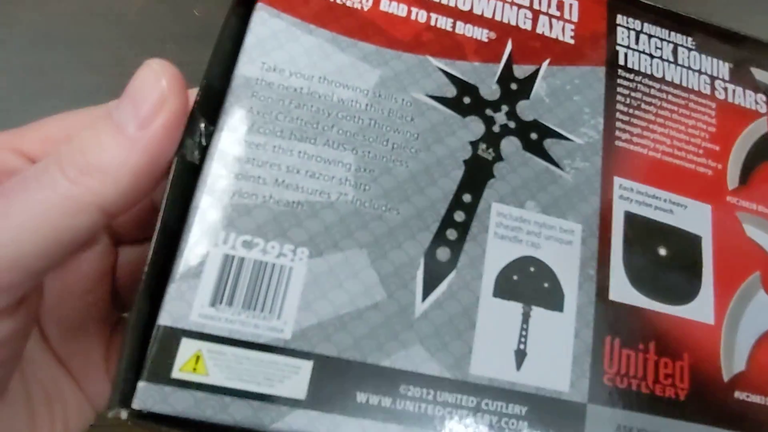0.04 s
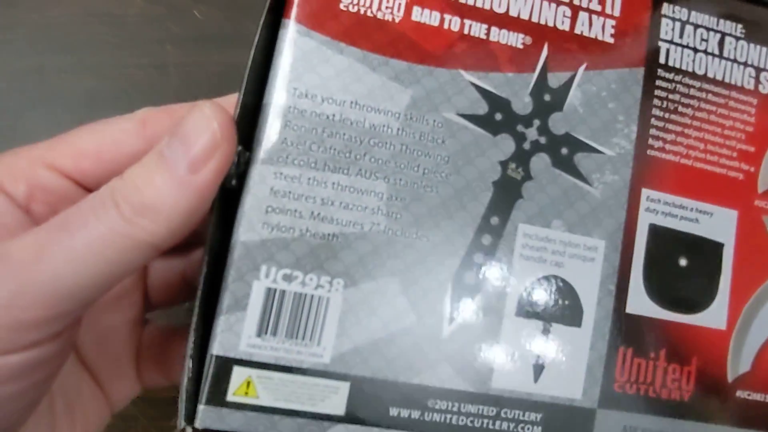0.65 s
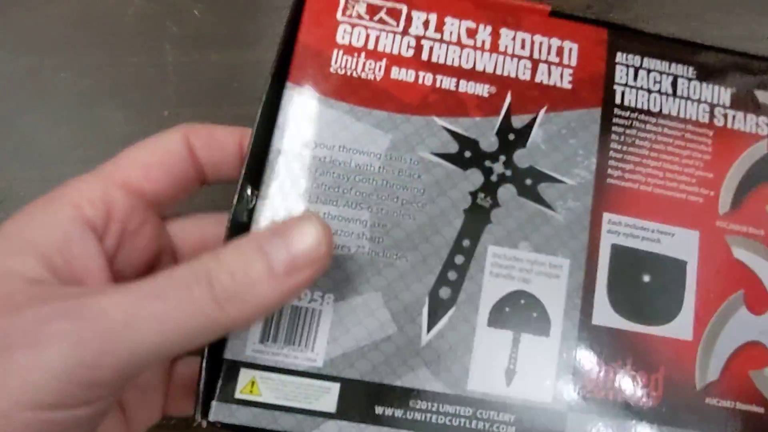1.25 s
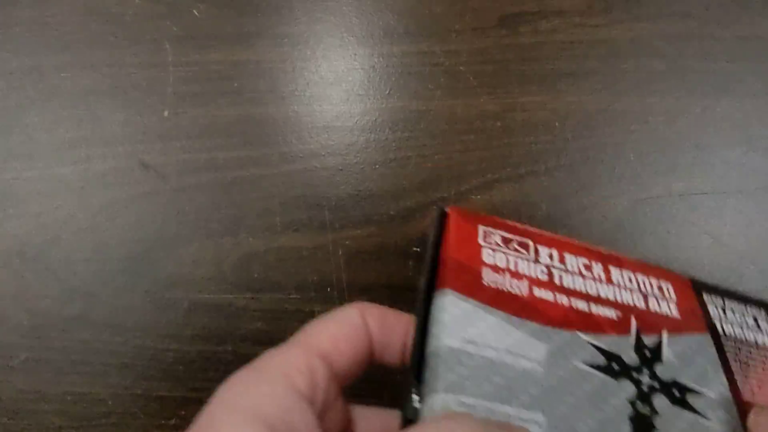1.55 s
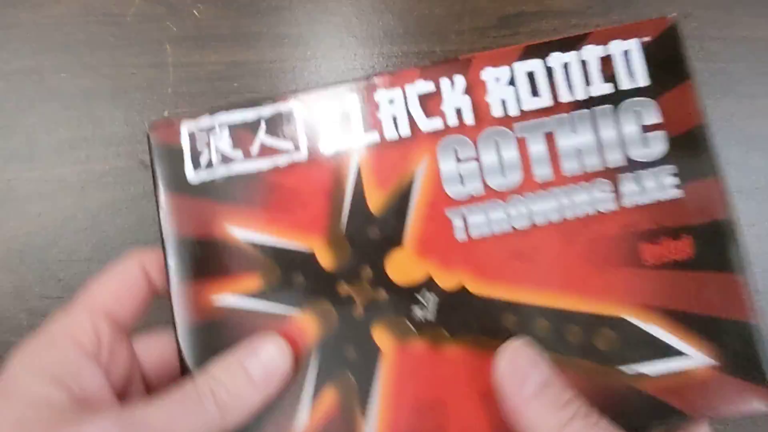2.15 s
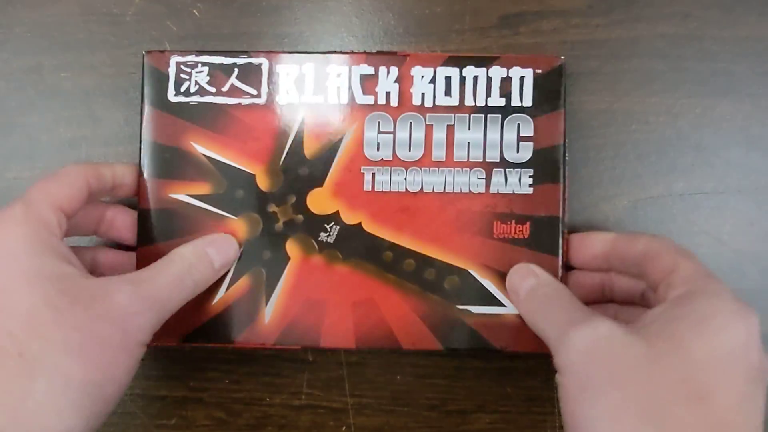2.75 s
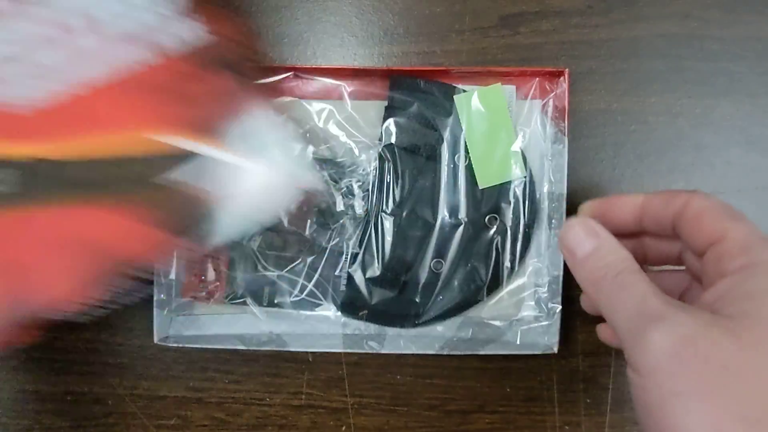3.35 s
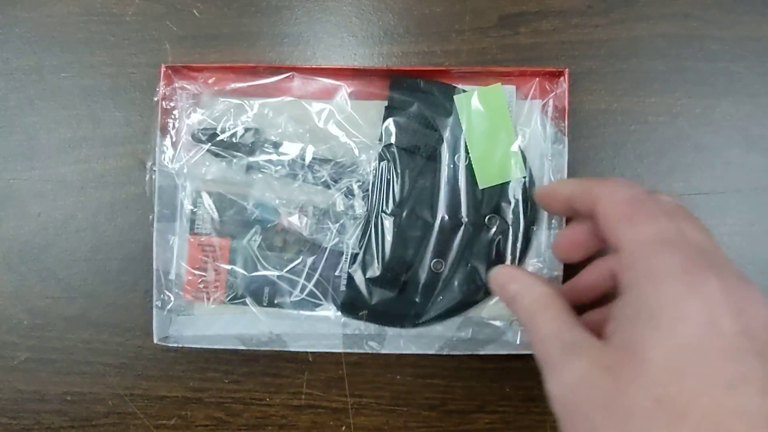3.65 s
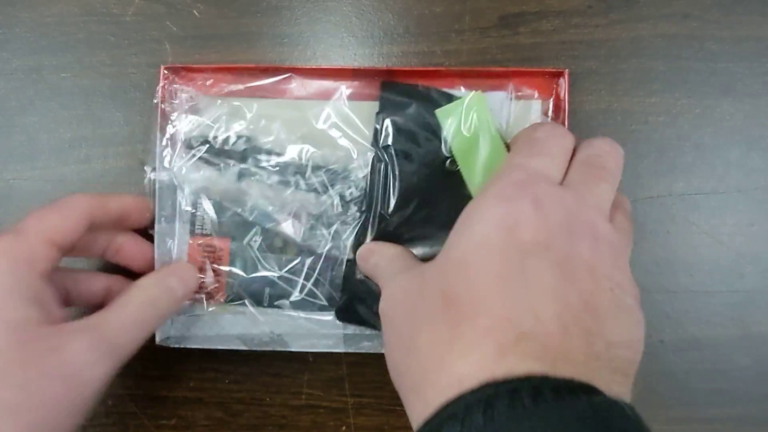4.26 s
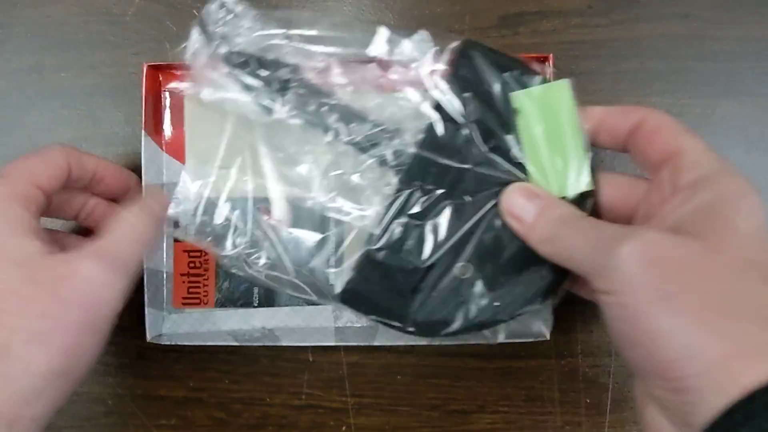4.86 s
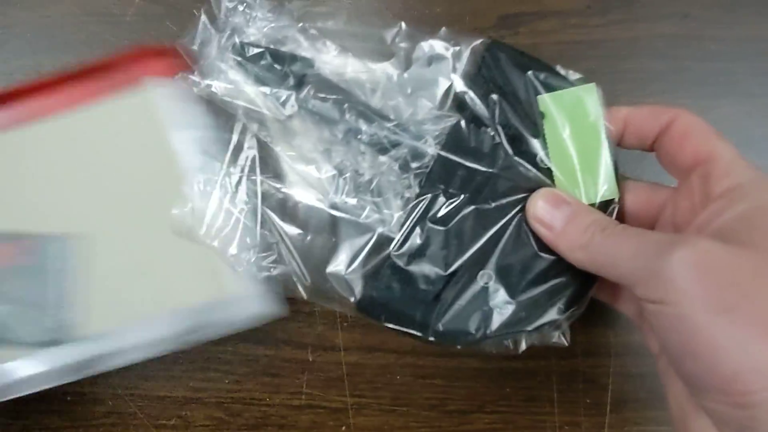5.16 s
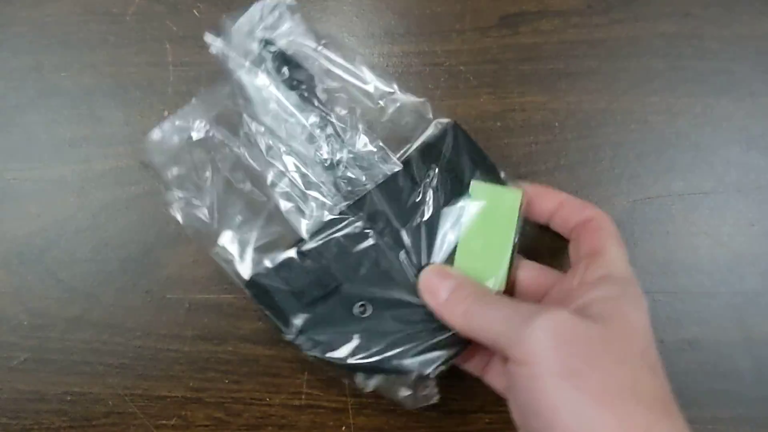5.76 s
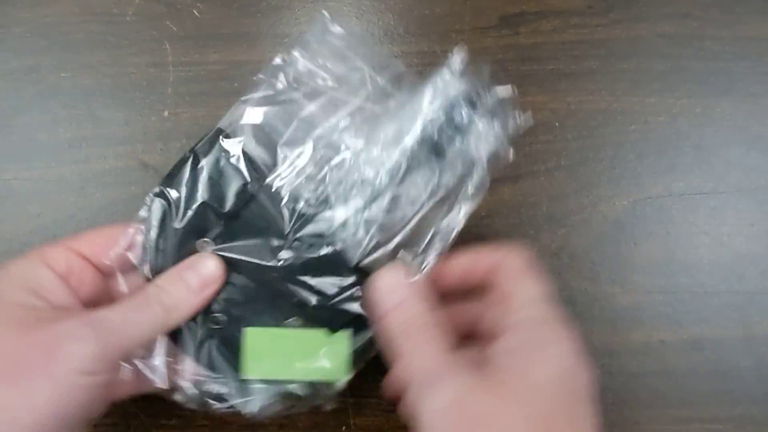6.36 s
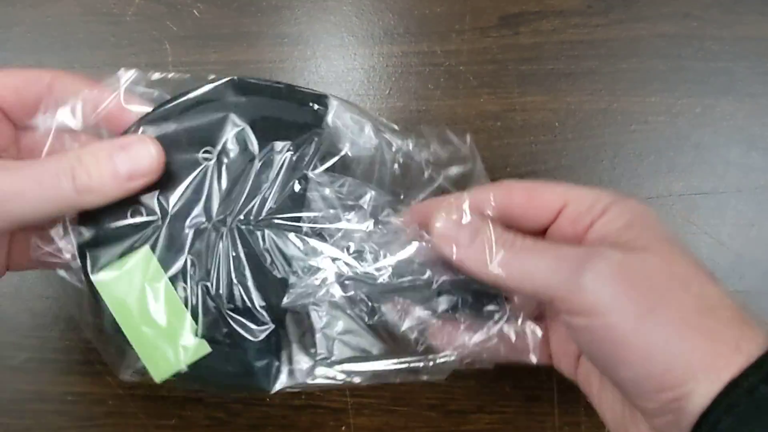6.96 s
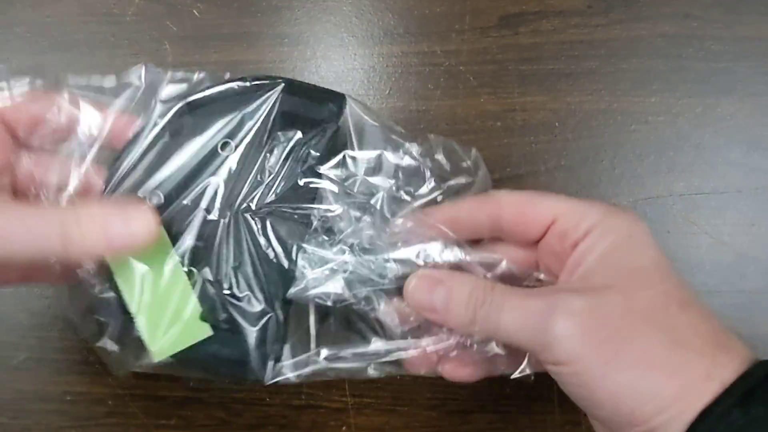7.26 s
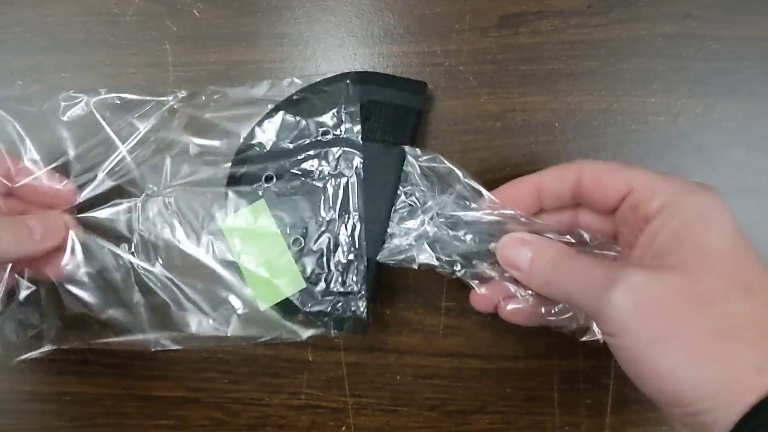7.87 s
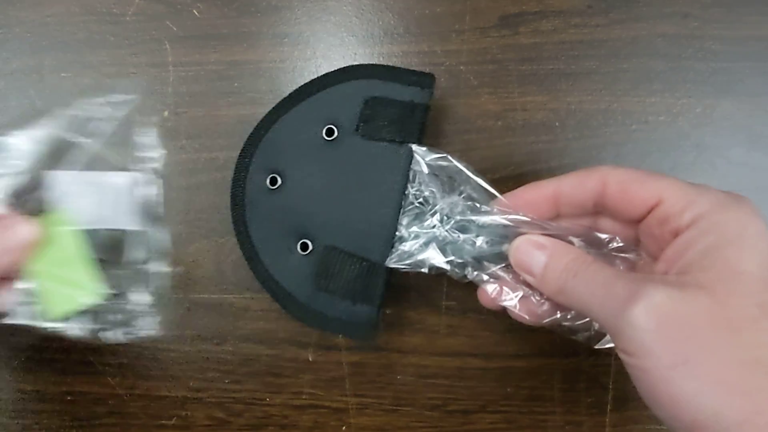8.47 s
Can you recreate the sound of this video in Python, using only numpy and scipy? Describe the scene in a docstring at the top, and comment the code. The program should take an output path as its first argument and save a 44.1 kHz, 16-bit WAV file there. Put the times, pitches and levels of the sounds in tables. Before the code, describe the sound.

A small, quiet room with a low hum and a couple of faint ticks around half a second. From about 1.4 seconds, hands turn a cardboard box over on a wooden table, with soft rubbing and hollow thumps, the clearest near 2 and 2.5 seconds. Around 2.9 seconds the tight lid creaks briefly and slides off with a scrape. A hard item clacks against its tray at about 3.7 and 3.9 seconds. From 4 seconds thin plastic wrapping crackles brightly in bunches of tiny snaps. It eases after 5 seconds, and a few more knocks and clacks come near 5.7 seconds. The crinkling then builds again in uneven swells with sharp single snaps as the film is pulled off, strongest from about 7.4 seconds to the end near 8.5 seconds. Everything is heard in stereo from close above the table.

```python
"""A few faint ticks in a quiet room, then rubbing and hollow thumps: hands turn a cardboard box over on a
wooden table. The tight lid creaks as it slides off, and a hard item clacks against its tray.
Then the main sound, bright crackling: the item is unwrapped from thin plastic film, which buckles in
avalanches of tiny snaps. All of it is heard in stereo from close above the table, in a small room."""
import sys
import numpy as np
from scipy import signal
from scipy.fft import rfft, irfft, next_fast_len
from scipy.io import wavfile
from scipy.ndimage import uniform_filter1d

SR = 44100
rng = np.random.default_rng(int(sys.argv[2]) if len(sys.argv) > 2 else 0)


def output_pcm(signal):
    """Save a mono or channel-first signal as 16-bit PCM at the path in sys.argv[1].

    Samples are clipped to [-1, 1] before scaling.
    """
    pcm = np.clip(np.atleast_2d(signal).T, -1, 1) * 32767
    wavfile.write(sys.argv[1], SR, np.round(pcm).astype(np.int16))


N = 375291
T = np.arange(N) / SR


def undb(db):
    """Decibels to gain."""
    return 10 ** (np.asarray(db) / 20)


def unit(x):
    """Scale to an energy of one per channel, on average."""
    return x / np.sqrt(np.mean(np.sum(x ** 2, axis=-1)))


def panned(db):
    """Left and right gains; a pan is always left minus right in dB."""
    gains = undb(np.array([[.5], [-.5]]) * db)
    return gains / np.sqrt(np.mean(gains ** 2, axis=0))


def placed(sound, pan_db, lag_s=.00036):
    """Put a sound to one side: quieter and a set lag later at the far microphone."""
    lag = int(SR * lag_s) if pan_db else 0
    left, right = sound * panned(pan_db)
    delayed = lambda x: np.concatenate([np.zeros(lag), x])[:len(x)]
    return np.array([left, delayed(right)] if pan_db > 0 else [delayed(left), right])


def add(out, s, sound):
    """Mix a sound in at s seconds."""
    i = max(int(s * SR), 0)
    out[:, i:i + sound.shape[1]] += sound[:, :N - i]


def on_log(hz, points):
    """Read (Hz, value) points on a log-frequency axis."""
    f, value = np.transpose(points)
    return np.interp(np.log(hz + 1), np.log(f), value)


def convolve(x, response):
    """Pass a sound through a response, keeping its length."""
    return signal.oaconvolve(np.atleast_2d(x), np.atleast_2d(response), axes=-1)[:, :np.shape(x)[-1]]


def colour(x, points, size=4096):
    """Minimum-phase EQ of unit energy, shaped by (Hz, dB) points."""
    gains = undb(on_log(np.fft.rfftfreq(size, 1 / SR), points))
    cepstrum = irfft(np.log(gains))
    cepstrum[1:size // 2] *= 2
    cepstrum[size // 2 + 1:] = 0
    return convolve(x, unit(irfft(np.exp(rfft(cepstrum)))))


def fade(t60, size):
    """Exponential decay, 60 dB down after t60 seconds."""
    return np.exp(-np.log(1000) * T[:size] / t60)


def stereo_noise(size):
    """Noise that is narrow in the bass and wide in the treble."""
    padded = next_fast_len(size, True)
    mid, side = rfft(rng.standard_normal((2, padded)))
    width = undb(on_log(np.fft.rfftfreq(padded, 1 / SR), [(500, -15), (1300, -7.5), (4000, -0.5)]))
    spectrum = (mid + np.array([[1], [-1]]) * width * side) / np.hypot(1, width)
    return irfft(spectrum, padded)[:, :size]


def burst(t60, size=8000):
    """A dying stereo noise of unit energy."""
    return unit(stereo_noise(size) * fade(t60, size))


def ring(modes, size=8000):
    """Struck modes; each blow lands elsewhere and shifts them a little."""
    out = 0
    for k, (hz, db, t60) in enumerate(modes):
        gain = (-1) ** k * undb(db + 2 * rng.normal())
        detuned_hz = hz * (1 + 0.023 * rng.normal())
        out = out + gain * fade(t60, size) * np.sin(2 * np.pi * detuned_hz * T[:size])
    return unit(out)


def gestures(table, swell_db=9, swell_shape=1.4, quiet_db=-80):
    """Hand movements swell, ebb and overlap. Rows while they sound: t/s, level/dB, body/dB, pan/dB."""
    t = T[::64]
    peak_s, rise, fall, db, body_db, pan_db = np.transpose(table)[:, :, None]
    away = np.maximum((peak_s - t) / rise, (t - peak_s) / fall)
    power = undb(db - swell_db * away ** swell_shape) ** 2 + 1e-18
    share = power / power.sum(axis=0)
    level_db = 10 * np.log10(power.sum(axis=0))
    rows = np.column_stack([t, level_db, (share * body_db).sum(axis=0), (share * pan_db).sum(axis=0)])
    return rows[level_db > quiet_db]


def avalanche(effort, peak_per_s, spread_db, bunch_db, bunch_s):
    """Bunched, uneven snaps, denser with more effort: their sample indices, stereo sizes and body gains."""
    s, *columns = np.transpose(effort)
    level_db, body_db, pan_db = (np.interp(T, s, c) for c in columns)
    per_s = peak_per_s * undb(.25 * (level_db - level_db.max()))
    bunch = uniform_filter1d(rng.standard_normal(N), max(int(bunch_s * SR), 2))
    scatter_db = spread_db * np.minimum(rng.exponential(size=N), 3.5)
    size = undb(scatter_db + bunch_db * np.clip(bunch / bunch.std(), -2, 2))
    size = size * (rng.random(N) < per_s / SR)
    # even out the running power, so that the gesture sets the loudness
    power = uniform_filter1d(uniform_filter1d(size ** 2, SR // 40), SR // 60)
    at = np.flatnonzero((size > 0) & (T > s[0]) & (T < s[-1]))
    sizes = size[at] / np.sqrt(power[at]) * undb(level_db[at]) * panned(pan_db[at])
    return at, sizes, undb(body_db[at])


def snapping(at, sizes, flutter_db, flutter_t60):
    """Each snap is a pulse that reaches the two microphones apart; the surface around it then flutters."""
    pulses = np.zeros((2, N))
    # the busiest spot wanders, and with it the lag of the left channel (samples)
    spots = T[::SR // 12]
    drift = np.interp(T, spots, rng.normal(4, 9, len(spots)))
    lag = np.clip(drift + 3 * rng.standard_normal(N), -16, 16).astype(int)[at]
    signed = sizes * rng.choice([-1, 1], N)[at]
    np.add.at(pulses[0], np.clip(at + lag, 0, N - 1), signed[0])
    np.add.at(pulses[1], at, signed[1])
    # the flutter carries each pulse's energy on for a few milliseconds
    decay = unit(fade(flutter_t60, size=1024)) ** 2
    left, right = stereo_noise(N // 6)
    noise = [left[(np.arange(N) - drift.astype(int)) % len(left)], np.resize(right, N)]
    flutter = np.sqrt(np.abs(convolve(pulses ** 2, decay))) * noise
    return (pulses + undb(flutter_db) * flutter) / np.hypot(1, undb(flutter_db))


# EQ of the room's noise bed: f/Hz, level/dB (table levels are relative; each layer adds its own trim)
BED_EQ = [(15, -63), (25, -0.5), (87, -6.5), (180, -6), (344, -16.5), (384, -16.5), (451, -18.5),
          (591, -15), (714, -21.5), (1370, -23), (1650, -28), (2280, -26.5), (2990, -32), (14400, -40.5),
          (16000, -59)]
def room_tone(level_db=-63):
    """A low room rumble near the centre, under a faint, wide microphone hiss."""
    size = next_fast_len(N, True)
    mid, side = rfft(rng.standard_normal((2, size)))
    width = undb(on_log(np.fft.rfftfreq(size, 1 / SR), [(150, -12.5), (600, 0), (2500, 1)]))
    air = irfft(mid + np.array([[1], [-1]]) * width * side, size)[:, :N]
    return colour(air, BED_EQ) * undb(level_db) * panned(-1.7)


# reverb time by band: f/Hz, t60/s
REVERB_BANDS = [(100, 0.31), (1200, 0.19), (4000, 0.15), (14000, 0.11)]
def room(x, wet_db=-14, build_s=0.0026, size=20000):
    """Add scattered echoes from table and walls, dying sooner in the treble."""
    hz = np.fft.rfftfreq(size, 1 / SR)
    echoes = rfft(rng.standard_normal((2, size)) ** 3)  # cubed for a spiky texture
    tail = 0
    for centre, t60 in REVERB_BANDS:
        band = on_log(hz, [(f, f == centre) for f, _ in REVERB_BANDS])
        tail = tail + irfft(echoes * band) * fade(t60, size)
    tail = unit(tail * (1 - np.exp(-T[:size] / build_s)))
    return x + undb(wet_db) * convolve(x, tail)


# bright EQ shared by hiss, ticks and snaps: f/Hz, level/dB
CRISP_EQ = [(1000, -24), (2500, -4.5), (3300, 0), (4800, 1.5), (6000, -0.5), (7100, 3.5), (8200, -0.5),
            (9200, 1), (10800, -3.5), (12500, 3.5), (14000, 1.5), (16000, -5.5)]
# midrange body of cardboard and tray: f/Hz, level/dB
PANEL_EQ = [(60, -27.5), (150, 1.5), (400, 3.5), (700, 5), (950, 7.5), (1280, 10.5), (1550, 3), (2300, 7),
            (3500, -0.5), (7000, -33)]
# rubbing strokes: peak t/s, rise/s, fall/s, hiss level/dB, scrape over hiss/dB, pan/dB
RUBS = [(1.36, .07, 0.15, -57, -5.5, -6), (1.479, 0.054, 0.057, -54.5, 3.5, -6),
        (1.62, 0.026, 0.094, -52.5, -2.5, -7), (1.775, 0.034, 0.047, -43.5, -2.5, -8),
        (1.975, 0.11, 0.076, -51, -2.5, -6), (2.26, 0.13, 0.13, -47.5, -3.5, -4),
        (2.304, .006, 0.0064, -38, -5, -4), (2.465, .08, 0.052, -55.5, 4, -1),
        (2.59, .04, 0.046, -60.5, 6, -2), (2.72, 0.075, 0.057, -59, 4.5, -2.5),
        (2.935, 0.059, 0.047, -48.5, -1, -2), (3.08, 0.043, 0.045, -51, -1, -1),
        (3.26, 0.065, .10, -51.5, 2, -1.5), (3.42, 0.045, 0.084, -62, -1.5, 1)]
def sliding():
    """Skin and cardboard slide: fine grains of friction hiss at the contact and scrape in the panel."""
    at, sizes, body = avalanche(gestures(RUBS), peak_per_s=22000, spread_db=1, bunch_db=3.5, bunch_s=.003)
    hiss = colour(snapping(at, sizes, flutter_db=1, flutter_t60=0.0082), CRISP_EQ)
    scrape = colour(snapping(at, sizes * body, flutter_db=4.5, flutter_t60=0.0072), PANEL_EQ)
    return undb(-1.66) * hiss + undb(-2.2) * scrape


# tugs on the lid: t/s, length/s, first slip rate/Hz, last slip rate/Hz, level/dB, panel over edge/dB
LID_TUGS = [(2.812, 0.079, 640, 730, -61.5, 15), (2.908, .07, 730, 156, -45.5, -6),
            (3.036, .07, 200, 1050, -50, -2)]
def creak(growth_db=6.5):
    """The tight lid slips in uneven jerks that grow with the pull and merge into a squeak when fast."""
    jerks = np.zeros((2, N))
    for s, length, first_hz, last_hz, db, panel_db in LID_TUGS:
        at = np.arange(int(s * SR), int((s + length) * SR))
        progress = (T[at] - s) / length
        hz = first_hz * (last_hz / first_hz) ** progress
        stagger, strength = rng.standard_normal((len(at), 2)).T
        cycles = np.cumsum(hz * (1 + .55 * stagger)) / SR
        slips = np.diff(np.floor(cycles), prepend=0) > 0
        size = slips * undb(db + growth_db * (progress - 2) + 3.1 * strength) * np.sqrt(SR / hz)
        jerks[:, at] += [size, size * undb(panel_db)]
    at_edge, in_panel = jerks
    edge = colour(convolve(at_edge, burst(0.0018)), CRISP_EQ)
    hollow_eq = [(300, -27), (650, 0.5), (950, 6), (1300, -1), (1700, -5), (2300, -1), (4000, -35)]
    return undb(-0.5) * edge + colour(in_panel, hollow_eq)


# low modes of the box's air and broad faces, before each blow's pitch and the grip: f/Hz, level/dB, t60/s
THUMP_MODES = [(71.8, -5, 0.16), (90.1, -4, 0.31), (115.6, 0, 0.22), (141, 2, 0.096), (188, 2.5, 0.083),
               (256, 2.5, 0.063), (328, 1, 0.055)]
# modes of the stiff panels: f/Hz, level/dB, t60/s
KNOCK_MODES = [(411, -5.5, 0.04), (551, -1, 0.041), (688, -5.5, 0.054), (775, -6, 0.049), (856, -4, 0.06),
               (983, 1, 0.045), (1214, 8, 0.027), (1426, 1, 0.039), (1740, -7, 0.043), (1990, -12, 0.018)]
# blows on the box: t/s, knock level/dB, thump level/dB, knock pan/dB, thump pitch/ratio
BOX_HITS = [(1.479, -42, -53, -5, 0.82), (1.605, -47, -59, -13, 1.26), (1.648, -50, -56, -14, 1.76),
            (1.747, -33.5, -47.5, -9, 0.78), (1.772, -41, -54, -9, 1), (1.972, -27, -34, -7.5, 1.017),
            (2.1, -30, -49, -9, 1.03), (2.194, -32, -49, -9, 0.76), (2.202, -32, -44, -0.5, 0.84),
            (2.4595, -22.5, -42, -1, 1.48), (2.684, -42, -61, -1, 1.37), (2.816, -44, -60, -6, 1.45),
            (3.25, -45, -59, 1, 1.1), (3.394, -67, -46.5, -4, 0.82), (3.522, -74, -49.5, 2.5, 0.74),
            (3.731, -34, -45.5, 5, 1.35), (3.945, -36, -48.5, 3, 1.54), (4.368, -61, -50, 1, 1.1),
            (4.644, -50, -55, 5, 0.78), (5.013, -62, -56.5, -5, 0.72), (5.685, -30, -44, 0, 1.8),
            (5.713, -30, -44, 0.5, 1.65), (5.758, -28.5, -42.5, 4, 1.34), (5.786, -30, -46, 3, 1.65),
            (6.015, -40, -44, 5, 1.4), (6.382, -41, -48.5, 1, 1.17)]
def knocks(contact_s=0.00034, grip_t60=.6, size=8000):
    """A blow ticks at the edge, knocks in the panel and thumps the whole box over a boom of the table."""
    out = np.zeros((2, N))
    attack = 1 - np.exp(-T[:size] / contact_s)  # cardboard gives under the blow
    grip = fade(grip_t60, size)  # the hands damp the thump
    for s, db, thump_db, pan_db, pitch in BOX_HITS:
        panel = unit(ring(KNOCK_MODES) + undb(-8.5) * colour(burst(0.032), PANEL_EQ))
        tick = undb(0.56 * db - 2) * colour(burst(0.039), CRISP_EQ)  # grows more slowly than the knock
        thump = unit(ring([(hz * pitch, mode_db, t60) for hz, mode_db, t60 in THUMP_MODES]) * grip)
        boom = ring([(78, 0, 0.094)]) / pitch ** 2  # softer, lower blows move the table more
        add(out, s, placed(attack * (undb(db + 22.5) * panel + tick), pan_db))
        add(out, s + .002, undb(thump_db + 31) * (thump + undb(-3.5) * boom) * panned(-2))
    return out


# modes of the loaded tray: f/Hz, level/dB, t60/s
TRAY_RING = [(147, -10, 0.35), (214, -21, 0.066), (360, -21, .08), (477, -7, .08), (640, -4, 0.16),
             (815, -8.5, 0.14), (1048, 5.5, 0.18), (1130, -4, 0.2), (2300, -9, 0.085), (2750, 6, 0.051),
             (3090, 1.5, 0.11)]
# the item hits its tray: t/s, crack level/dB, ring level/dB, pan/dB
TRAY_HITS = [(3.7405, -15, -41, 4.5), (3.866, -33, -48, 1.5), (3.9367, -10.5, -26, 3),
             (3.9398, -38, -31, -1), (5.667, -19.5, -35.5, 0.5), (5.7754, -21.5, -36, 6)]
# EQ of the hard attack: f/Hz, level/dB
CRACK_EQ = [(200, -22), (700, 0), (1100, -2), (1600, -8), (2300, 0.5), (2850, 6), (3400, 0.5), (4200, -7.5),
            (6500, -8), (10000, -20), (16000, -39)]
def clacks():
    """The item's hard edge chatters for a few milliseconds and the tray rings on."""
    out = np.zeros((2, N))
    for s, db, ring_db, pan_db in TRAY_HITS:
        crack = unit(colour(burst(0.027), CRACK_EQ))
        tray = unit(ring(TRAY_RING) + undb(-1.5) * colour(burst(0.22), PANEL_EQ))
        add(out, s + .0008, placed(undb(db + 17.5) * crack + undb(ring_db + 29.5) * tray, pan_db))
    return out


# body of the whole sheet rustling: f/Hz, level/dB
SHEET_EQ = [(50, -31), (140, -15), (300, -15), (550, -7), (750, -6.5), (950, -6.5), (1120, 0), (1380, 3),
            (1540, -4.5), (1800, 0.5), (2050, -3), (2300, 2.5), (2600, -5), (3500, -5.5), (7000, -28.5)]
# squeezes and pulls: peak t/s, rise/s, fall/s, crackle level/dB, rustle over crackle/dB, pan/dB
FILM_MOVES = [(3.755, 0.019, 0.062, -44.5, 4.5, 1.5), (3.96, 0.026, 0.076, -41.5, -2.5, -0.5),
              (4.39, 0.11, 0.12, -33.5, -9.5, -1.5), (4.595, 0.087, .06, -31.5, -5, -2),
              (4.74, 0.094, 0.049, -33.5, -6.5, -2), (4.797, 0.01, 0.0099, -40, 2, -3),
              (4.94, 0.09, 0.11, -45, -8, -1.5), (5.21, 0.12, 0.12, -51.5, -5, -1.5),
              (5.455, 0.039, 0.069, -48, -6.5, -3), (5.586, .02, .015, -49, -3.5, 3),
              (5.68, 0.02, .04, -44.5, 1, 6), (5.84, 0.091, 0.083, -38, -4.5, -1.5),
              (6.015, 0.11, 0.47, -39.5, -8, -1.5), (6.27, .06, .09, -34, -5, -2),
              (6.4, .07, .07, -37.5, -4, -1), (6.515, .03, .04, -32, -7.5, -3),
              (6.645, .015, 0.026, -33, -5.5, -5), (6.74, 0.069, .09, -39.5, -4.5, -1),
              (6.93, 0.11, 0.16, -38, -8.5, -1.5), (7.13, 0.11, 0.1, -36, -5.5, -1.5),
              (7.26, .04, .04, -45, -4, -1), (7.36, .04, .13, -32.5, -3.5, -0.5),
              (7.656, 0.077, 0.056, -30, -8.5, -1.5), (7.765, 0.073, 0.054, -29, -8, -1.5),
              (7.91, 0.2, 0.13, -34.5, -10.5, -1.5), (8.09, .05, 0.13, -34.5, -5.5, -0.5),
              (8.23, 0.056, 0.12, -32, -6.5, -1.5), (8.38, 0.11, 0.096, -31.5, -7, -1.5)]
def film():
    """Countless small creases flip; each ticks crisply and shakes the whole sheet."""
    effort = gestures(FILM_MOVES)
    at, sizes, body = avalanche(effort, peak_per_s=7000, spread_db=3.2, bunch_db=2.6, bunch_s=.0016)
    # the film gives way in fits: strain builds and lets go every few hundredths of a second
    fits = uniform_filter1d(rng.standard_normal(N), SR // 70)
    sizes = sizes * undb(1.7 * np.clip(fits / fits.std(), -2.5, 1.2))[at]
    crackle = colour(snapping(at, sizes, flutter_db=-3, flutter_t60=0.0027), CRISP_EQ)
    rustle = colour(snapping(at, sizes * body, flutter_db=3, flutter_t60=.016), SHEET_EQ)
    return undb(-1) * crackle + undb(0.76) * rustle * panned(-0.87)


def lesser_creases(count=130, full_effort_db=-10, db_per_effort_db=0.71, scatter_db=2, body_db=-10):
    """Cues for snaps at random moments, louder the harder the film is squeezed; rows as in ACCENT_SNAPS."""
    s, level_db, _, pan_db = gestures(FILM_MOVES).T
    when = rng.uniform(s[0], s[-1], count)
    strength, body, side = np.clip(rng.standard_normal((count, 3)).T, -1.7, 1.7)
    effort_db = np.interp(when, s, level_db - level_db.max())
    db = full_effort_db + db_per_effort_db * effort_db + scatter_db * strength
    return list(zip(when, db, body_db + 6.2 * body, np.interp(when, s, pan_db) + 4 * side))


# standout snaps of creases and edges: t/s, level/dB, body over crisp top/dB, pan/dB
ACCENT_SNAPS = [(0.4198, -47, 9, -1), (0.523, -37, 2, -7), (1.359, -35, -1, -2), (2.9042, -16, -4, -2),
                (3.155, -28, -0.5, -1.5), (3.2656, -20, -4, -3), (3.4, -35, -12, -5),
                (3.8065, -25, 6.5, -1), (4.017, -22, -13, -6), (4.1, -21.5, -19, -5.5),
                (4.1835, -13.5, -27, -7.5), (4.2893, -9.5, -11.5, -6.5), (4.5277, -8, -22, -3.5),
                (4.5559, -12, 0, -3.5), (4.626, -5.5, -22, -4), (4.8094, -13.5, -4.5, -4),
                (4.8845, -18, -11, -8.5), (4.916, -16, -19, -9), (4.9488, -12.5, -12, -11),
                (4.9913, -16, -20, -3.5), (5.06, -19, -18, -4), (5.102, -24.5, -12, -3.5),
                (5.233, -19, -11, -7), (5.243, -15, -21, -9), (5.286, -22, -10, 2), (5.305, -18, -24, -10),
                (5.367, -21.5, -15, -7.5), (5.395, -20, -9.5, -5.5), (5.47, -20.5, -10, 2.5),
                (5.4996, -22, -9, -5), (5.581, -15.5, -12, -9.5), (5.6453, -19, 0, -7),
                (5.838, -13.5, -4, -9), (5.9317, -9.5, -11, -5), (6.0057, -7.5, -6, -10),
                (6.2655, -9, -7, 2), (6.38, -9.5, -4.5, -2.5), (6.504, -6, -10.5, -4.5),
                (6.8143, -11, -9.5, -1.5), (6.8668, -14.5, -7, -4.5), (6.9127, -8.5, -6, -2),
                (7.0468, -7, -25, -6.5), (7.0849, -10, -10, -5), (7.1141, -9.5, -8, -5.5),
                (7.215, -10, -8.5, -0.5), (7.4, -8, -14, -5.5), (7.4828, -10, -24, 0),
                (7.5734, -11, -13, -9), (7.7268, -7.5, -4, 0), (7.8141, -8, -14, -1), (7.9083, -6, -5, -7),
                (8.0464, -8, -12.5, -3.5), (8.144, -5, -9.5, -3), (8.4416, -10, -1.5, 0)]
def creases(trim_db=4.5, size=1024):
    """Single stiff creases snap out above the rustle: a pulse, then a flutter, each in its own colour."""
    out = np.zeros((2, N))
    pulse = undb(-1.5) * signal.unit_impulse(size)
    for s, db, body_db, pan_db in ACCENT_SNAPS + lesser_creases():
        snap = unit(pulse + undb(3) * burst(0.0047, size) + undb(-2.5) * burst(0.024, size))
        # a small facet hardly moves the sheet and sounds brighter
        db_per_octave = -.18 * (body_db + 2.5)
        facet_eq = [(hz, band_db + db_per_octave * np.log2(hz / 7000) + 3.9 * rng.normal())
                    for hz, band_db in CRISP_EQ]
        crisp = colour(snap, facet_eq, size)
        shake = unit(snap + undb(1) * burst(0.029, size))
        body = undb(body_db) * colour(shake, SHEET_EQ, size)
        add(out, s, placed((crisp + body) * undb(db + trim_db), pan_db))
    return out


def scene():
    """All the handling in one short reverb, over the room tone."""
    handling = film() + creases() + sliding() + creak() + knocks() + clacks()
    return room(handling) + room_tone()


def record(dry):
    """Master EQ: a low cut at 52 Hz and a steep high cut at 15.9 kHz."""
    low_cut = signal.butter(5, 52, "high", fs=SR, output="sos")
    high_cut = signal.ellip(10, .2, 80, 15900, fs=SR, output="sos")
    return signal.sosfilt(high_cut, signal.sosfilt(low_cut, dry))


dry = scene()
out = record(dry)
output_pcm(out)
```